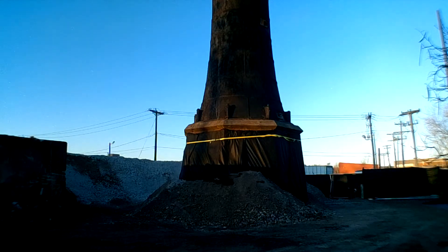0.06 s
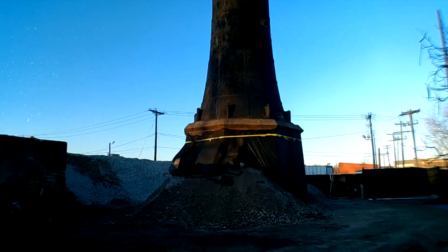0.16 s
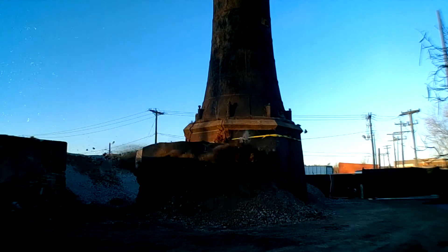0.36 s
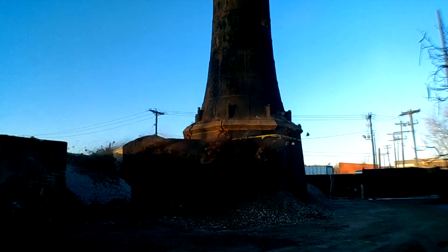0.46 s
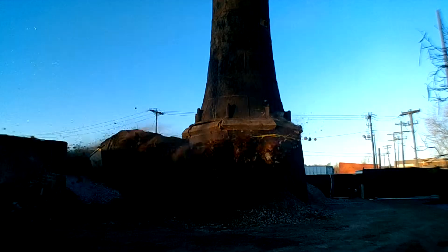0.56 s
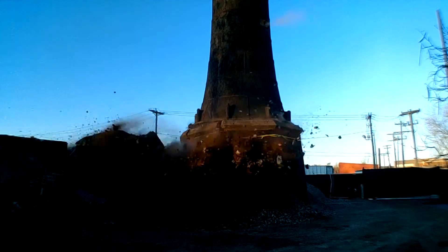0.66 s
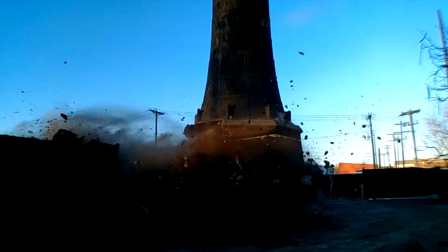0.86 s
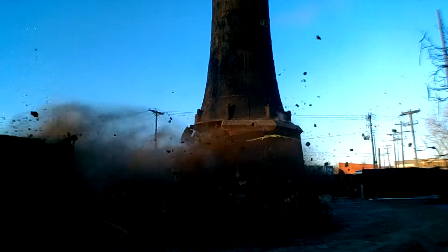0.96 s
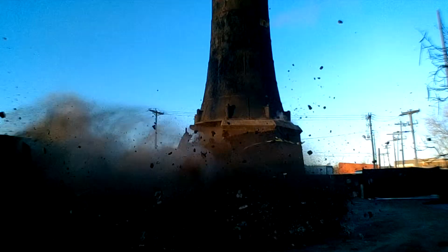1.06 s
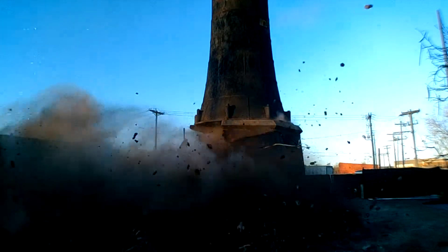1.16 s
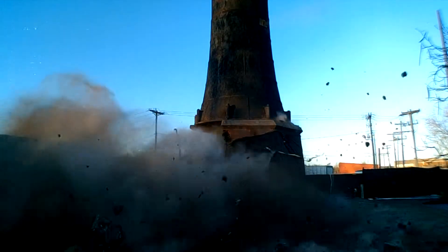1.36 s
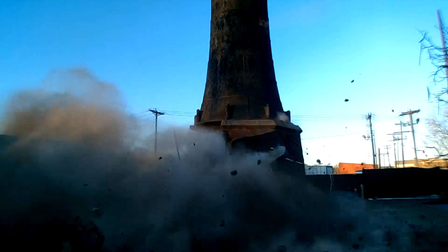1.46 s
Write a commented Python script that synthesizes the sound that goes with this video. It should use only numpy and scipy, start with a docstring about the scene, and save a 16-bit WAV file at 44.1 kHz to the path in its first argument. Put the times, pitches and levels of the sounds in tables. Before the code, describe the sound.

A demolition explosion in an open yard. Quiet air hush until 0.19 s, when a detonator snaps and several charges crack almost together at 0.2-0.25 s, with a booming gas roar, hissing grit and ground rumble fading quickly. Two duller, weaker charges thump near 0.55 s, with a low push at 0.65. Rubble bursts at 0.78 s; lumps, gravel and single stones patter unevenly until 1.5 s.

```python
"""Demolition charges blow out the foot of a brick chimney: quick pushes of air, each with a short noisy crack.
A detonator snaps first, gas roars and grit sprays over a ground rumble, and two duller charges follow.
Then comes a burst of rubble and a shower of debris. Shaped noise makes the roar, grit, rubble and rumble.
The microphone housing colours all the noise. The right channel is weaker, thin in the bass and inverted."""
import sys
import numpy as np
from scipy.fft import rfft, irfft, next_fast_len
from scipy.io import wavfile
from scipy.ndimage import uniform_filter1d

SR = 44100
rng = np.random.default_rng(int(sys.argv[2]) if len(sys.argv) > 2 else 0)


def persist_wave(psi):
    """Save psi, clipped to +-1, as 16-bit WAV."""
    counts = np.round(np.clip(psi, -1, 1) * 32767).astype(np.int16)
    wavfile.write(sys.argv[1], SR, np.atleast_2d(counts).T)


N = 66150  # samples, 1.5 s

SUCTION = .8  # depth of the suction as a share of the push before it
# spectrum of cracks and sprayed sand: (frequency [Hz], relative level [dB])
SPRAY_COLOUR = [(200, -8), (1200, -3), (2500, -2), (3800, 0), (5400, -3), (6500, -14), (8000, -14),
                (10000, -26.5), (15000, -29)]


def amp(db):
    """Turn decibels into a gain."""
    return 10 ** (np.asarray(db) / 20)


def unit(x):
    """Scale to an average strength (rms) of 1."""
    return x / np.sqrt(np.mean(x ** 2) + 1e-20)


def along(points, hz):
    """Read a value between (frequency, value) points on a logarithmic frequency axis."""
    f, value = np.transpose(points)
    return np.interp(np.log(hz + 1), np.log(f + 1), value)


def since(start):
    """Seconds since a moment, zero before it."""
    return np.maximum(np.arange(N) / SR - start, 0)


def levels(rows):
    """Turn each dB column after the time into one gain per sample."""
    s, *columns = np.transpose(rows)
    return [amp(np.interp(since(0), s, column)) for column in columns]


def filtered(x, response):
    """Change the strength and phase of each frequency in x by a response."""
    m = next_fast_len(N + SR // 2)  # spare room so the end does not wrap onto the start
    hz = np.fft.rfftfreq(m, 1 / SR)
    return irfft(rfft(x, m) * response(hz), m)[..., :N]


def coloured(x, colour):
    """Let x ring through a spectrum and the housing's resonances, never ahead of its cause; rms 1."""
    # resonances and notches of the housing: (frequency [Hz], width [Hz], boost [dB])
    housing = [(1325, 100, 4), (1460, 50, 8.5), (1540, 130, -4), (2020, 90, -3), (2140, 130, 4),
               (2290, 130, -5), (2440, 80, 3), (2620, 90, 4), (3200, 130, -7), (3620, 190, 5),
               (3900, 150, -6), (4200, 110, 3), (4550, 170, 5), (4880, 260, -9), (5430, 260, 5),
               (5890, 260, -8), (6250, 170, 5), (7190, 180, -6), (7830, 260, 4), (8220, 300, -4)]
    hz = np.fft.rfftfreq(N, 1 / SR)
    db = along(colour, hz)
    for f, width, boost in housing:
        db = db + boost / (1 + (2 * (hz - f) / width) ** 2)
    # folding the cepstrum gives a minimum-phase filter: all ringing comes after the input
    cepstrum = irfft(np.log(amp(db)), N)
    fold = 2 * (np.arange(N) < N // 2) - (np.arange(N) == 0)
    response = np.exp(rfft(cepstrum * fold))
    return unit(irfft(rfft(x) * response, N))


def rush(colour):
    """Make two unrelated noises: direct and scattered sound."""
    return coloured(rng.standard_normal((2, N)), colour)


def grains(colour, per_s):
    """Mix random impacts of uneven size with a wash of steady noise."""
    spread_db, share = 3, .5  # spread of impact sizes [dB]; impacts' share of the power
    struck = rng.random((2, N)) < per_s / SR
    sign = np.sign(rng.standard_normal((2, N)))
    size = amp(spread_db * rng.standard_normal((2, N)))
    impacts = unit(struck * sign * size)
    wash = rng.standard_normal((2, N))
    return coloured(np.sqrt(share) * impacts + np.sqrt(1 - share) * wash, colour)


def burst(start, db, attack, hold, t60):
    """Rise, then fade exponentially by 60 dB every t60 seconds after the hold."""
    rise = np.minimum(since(start) / attack, 1)
    fade = np.exp(-np.log(1000) * since(start + attack + hold) / t60)
    return amp(db) * rise * fade


def pressure_wave(start, push, suction, depth):
    """Push the air, then suck it back; smoothing stands for the rounding by distance."""
    def lobe(s, length):
        return np.sin(np.pi * np.minimum(since(s) / length, 1))
    wave = lobe(start, push) - depth * lobe(start + push, suction)
    return uniform_filter1d(wave, size=13)


def swell(start, length):
    """Raise the pressure smoothly between two shallow troughs."""
    u = 2 * (since(0) - start) / length - 1  # -1 to 1 during the rise
    return (1 - u ** 2) * np.exp(-u ** 2 / 2)


def background():
    """The ground rumbles under a steady hush of open air, with a narrow faint whine near 9.5 kHz."""
    # spectrum of the ground rumble: (frequency [Hz], relative level [dB])
    rumble_colour = [(15, 0), (30, 3), (50, -2), (75, -2), (115, -4), (170, -17), (400, -32), (1500, -60),
                     (15000, -110)]
    # strength of the ground rumble: (time [s], level [dB])
    rumble_level = [(0, -70), (.145, -64), (.172, -49), (.19, -42), (.215, -33), (.27, -38), (.37, -39),
                    (.52, -45), (.62, -40), (.72, -47), (.78, -47), (.83, -41), (.91, -48), (1.0, -44),
                    (1.25, -48), (1.38, -54), (1.5, -57)]
    # spectrum of the open air: (frequency [Hz], relative level [dB])
    air_colour = [(25, 8), (70, -2), (150, -10), (400, -1.5), (900, -1), (1300, 2), (1900, -12), (2700, -8),
                  (4500, -16), (7000, -24), (9300, -27), (9520, -17), (9750, -27), (15000, -29)]
    rumble_gain, = levels(rumble_level)
    rumble = rumble_gain * rush(rumble_colour)
    air = amp(-54.5) * rush(air_colour)
    return rumble + air


def debris():
    """Rubble lands in a burst of impacts; chunks push air, and lumps, gravel and single stones patter."""
    # falling debris: (time [s], heavy lump level [dB], fine gravel level [dB])
    shower_levels = [(.2, -80, -90), (.33, -46, -58), (.45, -50, -64), (.54, -55, -69), (.62, -54, -60),
                     (.66, -50, -53), (.74, -47, -51), (.79, -42, -46), (.91, -50, -55.5),
                     (1.0, -44.5, -52), (1.05, -45, -51), (1.15, -39, -45), (1.21, -40, -46),
                     (1.3, -43, -47), (1.34, -50, -53), (1.44, -53, -57), (1.5, -49, -56)]
    # spectrum of heavy lumps: (frequency [Hz], relative level [dB])
    fall_colour = [(40, -14), (130, -5), (280, 2.5), (500, -4), (850, -9), (1400, -9), (1900, -20),
                   (4000, -34), (15000, -60)]
    # spectrum of gravel and stones: (frequency [Hz], relative level [dB])
    patter_colour = [(200, -14), (1000, -4), (1500, -2), (2600, -2), (4400, -2.5), (6000, -8), (8600, -12),
                     (10000, -23), (15000, -25.5)]
    # single stones striking: (time [s], level at the strike [dB])
    stone_strikes = [(.6505, -45.5), (.6777, -53), (.755, -47), (1.0743, -43), (1.1261, -44), (1.153, -43),
                     (1.212, -45), (1.262, -44), (1.2768, -41), (1.308, -46)]
    # heavy chunks hitting the ground: (time [s], push level before rounding [dB], push length [s])
    chunk_hits = [(.7818, -23, .0009), (.7892, -26, .0007), (.8035, -23, .0012), (.8205, -23, .0008),
                  (.991, -35, .002), (1.026, -35, .0017), (1.11, -34, .0012), (1.151, -28, .0016),
                  (1.257, -32, .0017), (1.476, -36, .0017)]
    # spectrum of the rubble: (frequency [Hz], relative level [dB])
    rubble_colour = [(30, -12), (90, -9), (170, -2), (260, -2), (380, -7), (520, 2), (680, -1), (900, -5),
                     (1300, -9), (1560, -4), (1850, -13), (2300, -18), (4400, -19.5), (8000, -30),
                     (10000, -41), (15000, -48)]

    heavy, fine = levels(shower_levels)
    lumps = heavy * grains(fall_colour, per_s=450)
    gravel = fine * grains(patter_colour, per_s=2400)
    strikes = sum(burst(s, db, attack=.0005, hold=0, t60=.035) for s, db in stone_strikes)
    stones = strikes * rush(patter_colour)
    knocks = sum(amp(db) * pressure_wave(s, push, push, SUCTION) for s, db, push in chunk_hits)
    rubble_swell = burst(start=.773, db=-29.6, attack=.011, hold=.035, t60=.22)
    rubble = rubble_swell * grains(rubble_colour, per_s=1800)
    return lumps + gravel + stones + knocks + rubble


def blast():
    """The detonator snaps, gas roars with each group of charges, and sand and grit spray out."""
    # spectrum of the detonator's snap: (frequency [Hz], relative level [dB])
    snap_colour = [(300, -9), (1500, -10), (2200, 3), (2700, 0), (3300, -7), (4300, -12), (5500, -34),
                   (15000, -50)]
    # spectrum of the first gas roar: (frequency [Hz], relative level [dB])
    roar_colour = [(30, -5), (72, 3), (115, -8), (155, -1), (220, -5), (295, 3.5), (390, -6), (480, 4.5),
                   (570, -4), (700, 2), (810, -9), (930, -5), (1080, -9), (1900, -15), (3000, -24),
                   (6000, -40), (15000, -58)]
    # spectrum of the second gas roar: (frequency [Hz], relative level [dB])
    after_colour = [(40, -3), (150, 0), (450, -1), (800, -11), (1400, -9), (2000, -27), (4000, -27),
                    (6000, -40), (15000, -56)]
    # spectrum of the grit: (frequency [Hz], relative level [dB])
    grit_colour = [(40, -2), (200, 0), (500, -3), (1300, -8), (2000, -13), (4300, -12), (6500, -22),
                   (8000, -23), (10000, -35), (15000, -38)]

    # times in seconds
    snap = burst(start=.1925, db=-33.5, attack=.0005, hold=.002, t60=.055) * rush(snap_colour)
    roar = burst(start=.203, db=-26.5, attack=.002, hold=.022, t60=.29) * rush(roar_colour)
    after_roar = burst(start=.551, db=-42, attack=.003, hold=.015, t60=.42) * rush(after_colour)
    spray_swell = burst(start=.2115, db=-33.3, attack=.01, hold=.011, t60=.21)
    spray = spray_swell * grains(SPRAY_COLOUR, per_s=4000)
    grit_swell = burst(start=.24, db=-34.5, attack=.065, hold=.01, t60=.2)
    grit = grit_swell * grains(grit_colour, per_s=1500)
    return snap + roar + after_roar + spray + grit


def charges():
    """Each charge sends a pressure wave and a short crack; heaving masonry pushes air more slowly."""
    # charges: (time [s], push level before rounding [dB], push length [s], suction length [s],
    # crack level [dB])
    firings = [(.2057, -20, .0009, .004, -50), (.2127, -21, .0010, .0012, -39),
               (.2188, -17, .0028, .0013, -42), (.2255, -14.5, .0013, .002, -34),
               (.2460, -22, .0009, .0012, -43), (.5525, -22, .0013, .0032, -62),
               (.5615, -23.3, .0018, .0024, -66)]
    # slow pushes of displaced air: (time [s], peak level [dB], length [s])
    heave_times = [(.2292, -16, .0066), (.340, -35, .026), (.5655, -25, .015), (.652, -24.5, .024)]

    waves, crack_gain = 0, 0
    for s, db, push, suction, crack_db in firings:
        waves = waves + amp(db) * pressure_wave(s, push, suction, SUCTION)
        crack_gain = crack_gain + burst(s, crack_db, attack=.0005, hold=0, t60=.03)
    heaves = sum(amp(db) * swell(s, length) for s, db, length in heave_times)
    return waves + heaves + crack_gain * rush(SPRAY_COLOUR)


def scene():
    """The left side hears direct sound; the right mixes in scattered sound, mostly in the treble."""
    # how alike the two sides are: (frequency [Hz], likeness [0-1])
    right_alike = [(50, .7), (150, .98), (700, .99), (1400, .97), (2600, .9), (4500, .87), (8000, .65),
                   (15000, .45)]

    def alike(hz):
        return np.clip(along(right_alike, hz), 0, 1)

    def unlike(hz):
        return 1j * np.sqrt(1 - alike(hz) ** 2)  # 1j shifts the phase by a quarter turn

    direct, scattered = background() + debris() + blast() + charges()
    right = filtered(direct, alike) + filtered(scattered, unlike)
    return np.array([direct, right])


def record(dry):
    """Invert, weaken and phase-shift the right channel; cut everything from 15750 Hz up in both."""
    # right channel strength: (frequency [Hz], level [dB])
    right_level = [(30, -38), (70, -37), (110, -19), (190, -6.5), (380, -5.5), (1200, -7), (2400, -9),
                   (4400, -12), (8100, -14), (15000, -18)]
    # right channel phase lag besides the inversion: (frequency [Hz], lag [rad])
    right_lag = [(100, -.2), (260, .25), (800, .4), (2400, .6), (4800, .72), (14000, .9)]

    def right_response(hz):
        gain = -amp(along(right_level, hz))  # the minus sign inverts
        return gain * np.exp(-1j * along(right_lag, hz))

    right = filtered(dry[1], right_response)
    return filtered(np.array([dry[0], right]), lambda hz: hz < 15750)


dry = scene()
out = record(dry)
persist_wave(out)
```